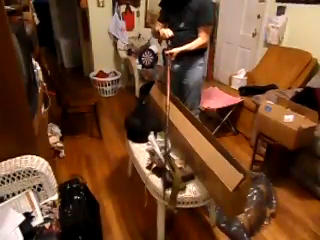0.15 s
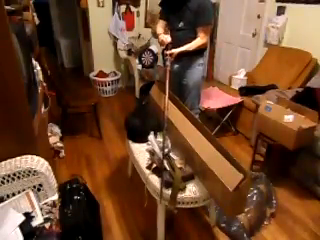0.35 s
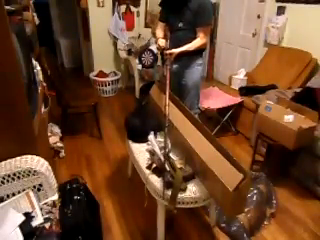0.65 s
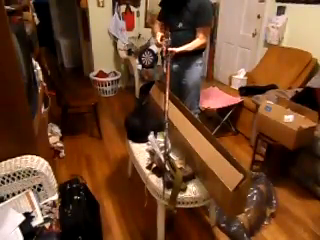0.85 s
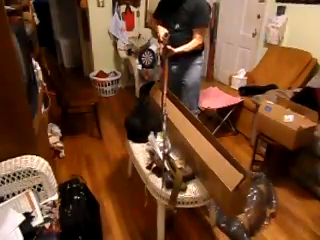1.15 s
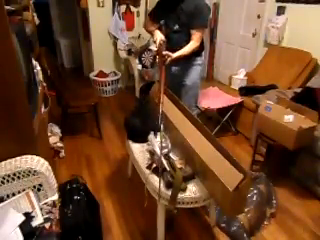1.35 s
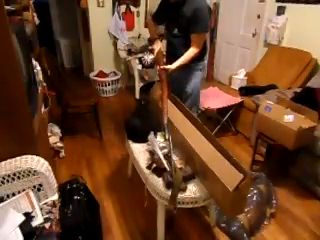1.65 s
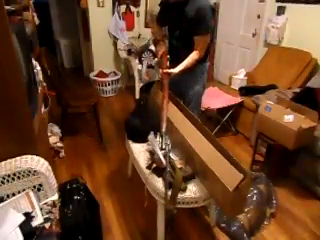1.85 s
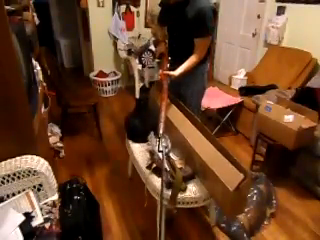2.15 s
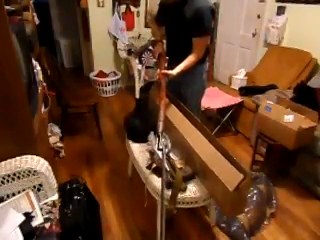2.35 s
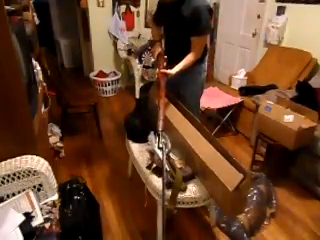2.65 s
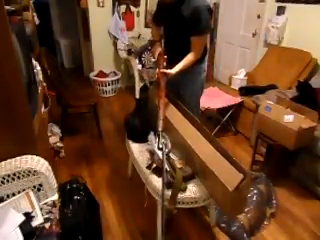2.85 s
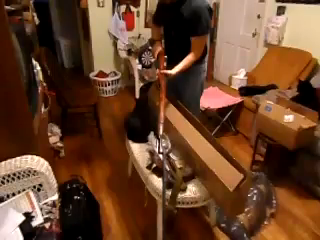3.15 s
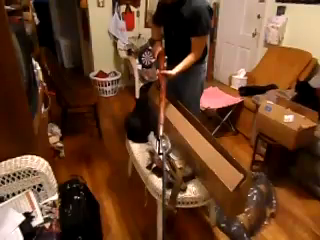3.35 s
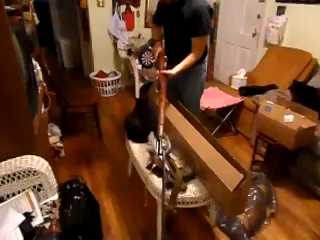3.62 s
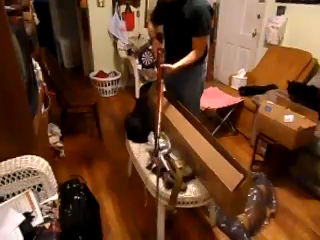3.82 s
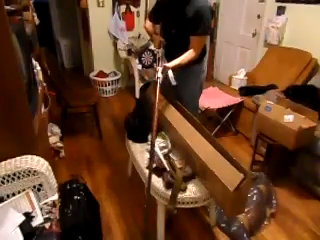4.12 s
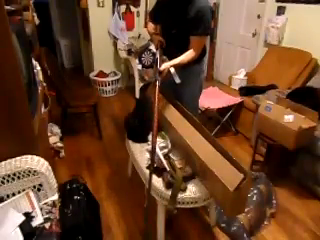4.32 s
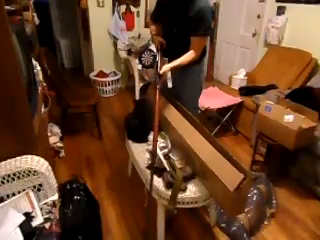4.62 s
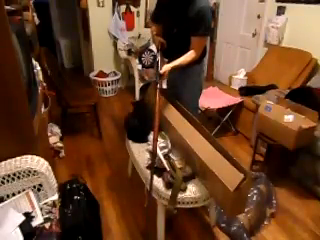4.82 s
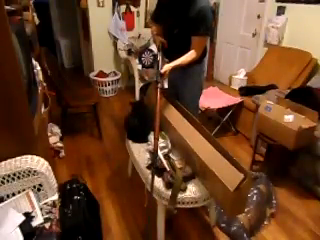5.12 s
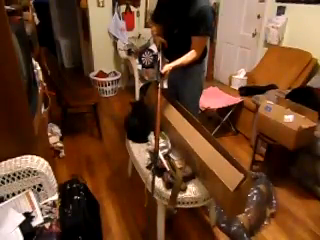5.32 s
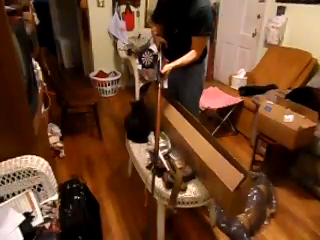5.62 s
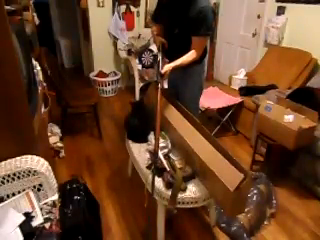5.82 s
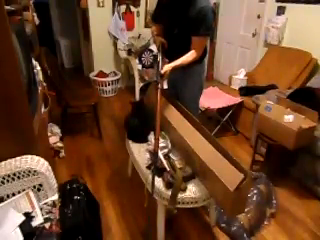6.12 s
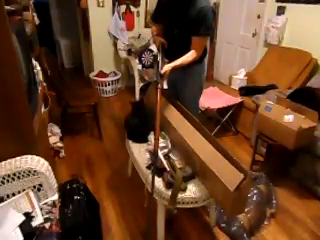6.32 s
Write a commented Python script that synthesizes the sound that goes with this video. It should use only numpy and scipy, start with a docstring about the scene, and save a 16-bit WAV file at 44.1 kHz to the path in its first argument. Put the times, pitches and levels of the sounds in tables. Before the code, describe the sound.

A rifle bolt is worked by hand in a furnished room with quick metal clacks, then light handling, two footsteps, and a sharp dry-fire snap.

```python
"""A bolt-action rifle is cycled in a furnished room: the bolt is lifted, drawn back, run home and locked. Each
blow is a dying burst of tiny impacts, coloured by the struck part, with decaying modes for the ring; rubbing is
random stick and slip. The striker later snaps on an empty chamber. Between the two, the fittings tick, the
sight clicks and the handler takes two steps on the wooden floor, while sleeves brush softly. House rumble lies
below; a small camera adds hiss, a thin whine, a faint buzz and gain control."""
import sys
import numpy as np
from scipy import signal
from scipy.fft import rfft, irfft
from scipy.io import wavfile

SR = 44100
rng = np.random.default_rng(int(sys.argv[2]) if len(sys.argv) > 2 else 0)


def store_wav(level_fs):
    """Save 16-bit WAV to argv[1]."""
    pcm = np.round(np.clip(np.atleast_2d(level_fs), -1, 1) * 32767)
    wavfile.write(sys.argv[1], SR, pcm.T.astype(np.int16))


N = 285327
T = np.arange(N) / SR  # time axis [s]

# Background spectrum of rumble and hiss: (frequency [Hz], relative level [dB])
HUSH_SPECTRUM = [(12, -28.5), (20, 8), (38, 0), (64, -2.5), (119, -14.5), (245, -17), (416, -24.5),
                 (705, -25.5), (1010, -28), (1820, -30.5), (8400, -37), (10200, -37), (11100, -38),
                 (15500, -36.5)]
HUSH_DB = -54  # rms level
# Decay time of the room: (frequency [Hz], t60 [s])
ROOM_DECAY = [(60, .2), (250, 0.24), (700, 0.26), (1500, .25), (3000, .27), (6500, .27), (10000, .23),
              (16000, .2)]
BAND_EDGE_HZ = 15780

# Steps: (heel lands [s], energy [dB], scuff before the heel [s], heel to sole and sole to toe [s],
# decay of sole and toe contacts [s], sway of the floor [dB])
STEPS = [(1.8722, -20.5, .074, .04, 0.067, -36), (2.36, -13.5, .156, .031, .016, -34.5)]
# Heel clack, sole thud, soft toe: (energy above the step's [dB], brightness [dB per octave],
# resonance of the board [Hz], its lift [dB])
FOOT_PARTS = [(-0.5, 1.5, 766, 10.5), (0, -1, 290, 8.5), (-7, -4, 57, 16)]
# A shoe brushes the floor before it lands: (energy [dB], brightness [dB per octave],
# contact decay [s], resonance of the board [Hz], its lift [dB])
SHOE_SCUFF = (-23, 1.3, 0.2, 277, 9)
# Colour of the floorboards: (frequency [Hz], relative level [dB])
BOARD_SPECTRUM = [(30, 6), (70, 1.5), (110, -2), (280, -4.5), (500, -12), (800, -18), (1300, -23),
                  (3000, -30.5), (12000, -57)]
# Modes of the boards, humming briefly after a step: (frequency [Hz], relative energy [dB], t60 [s])
PLANK_MODES = [(69.6, -10, 0.33), (146.8, -0.5, 0.22), (229, 2, 0.32), (285.5, -15, .3), (390, -9, 0.16),
               (763, -14, 0.21)]
HEEL_DECAY_S = 0.01
SWAY_DELAY_S = 0.016  # weight reaches the joists after the heel lands

# Sleeves brush as the arms move: (middle [s], half length [s], level [dB])
REACHES = [(.45, 0.5, -57.5), (1.413, 0.062, -61), (2.607, .6, -66.5), (4.35, 0.33, -65.5)]
# Colour of rubbed cloth: (frequency [Hz], relative level [dB])
CLOTH_SPECTRUM = [(60, -9), (150, -7.5), (300, -1.5), (700, -7), (1200, -17.5), (3000, -21), (15000, -32)]
FIDGET_DB = -73  # cloth between the movements

# Clear ticks of the fittings: (time [s], energy [dB], brightness [dB per octave],
# contact decay [s], resonance of the part [Hz], its lift [dB])
TICKS = [(1.1154, -24, -1, 0.0032, 6000, 11.5), (1.2688, -31, -1.5, .018, 13970, 3.5),
         (1.3136, -34.5, -4.5, 0.004, 2450, 8), (1.3825, -35, -2, .003, 800, 24),
         (1.4199, -32, -5, .008, 2060, 10), (1.5525, -31.5, -5, 0.011, 1720, 8.5),
         (2.1603, -31.5, -7, 0.0046, 1800, -2), (2.267, -30, -7.5, 0.0081, 783, 14),
         (2.6788, -29, 4, .017, 4300, 14.5), (2.9898, -30.5, -0.5, .0087, 4360, 10),
         (3.0003, -24.5, -0.5, 0.021, 4320, 14.5), (3.008, -29, -4, 0.01, 6220, 21),
         (3.068, -29, 2, 0.0066, 6610, 15), (3.3156, -35, -7, .0048, 4980, 6.5),
         (3.6059, -33.5, -7.5, 0.0096, 4730, 14)]
# Faint rattles as the grip shifts and with each step: (middle [s], half length [s], level [dB])
SHAKES = [(1.483, 0.089, -70), (1.949, 0.021, -58.5), (2.233, 0.036, -65.5), (2.402, 0.037, -53.5)]
# Colour of the fittings: (frequency [Hz], relative level [dB])
FITTING_SPECTRUM = [(100, -17), (600, -6.5), (1500, -0.5), (3000, -3), (6400, -2.5), (8500, -5),
                    (12000, -1.5), (14500, 4.5), (16000, -6.5)]
# Clicks of the sight: (time [s], energy [dB])
SIGHT_CLICKS = [(2.7257, -27), (3.1694, -30.5), (3.4306, -26.5), (3.6832, -26.5)]
# Colour of the sight: (frequency [Hz], relative level [dB])
SIGHT_SPECTRUM = [(200, -36), (950, -11), (1400, 3.5), (1750, -0.5), (2100, -1.5), (2800, -11),
                  (4500, -14.5), (8000, -20), (9400, -10.5), (11000, -26), (16000, -24)]
CLICK_TILT_DB, CLICK_DECAY_S, CLICK_HZ, CLICK_LIFT_DB = 0.5, 0.0053, 2047, 8  # tilt is per octave

# The sear lets go and the striker lands: (time [s], energy [dB], brightness [dB per octave],
# contact decay [s], resonance of the part [Hz], its lift [dB])
SNAP_CONTACTS = [(6.0227, -12, 10, 0.0021, 1204, 9.5), (6.0242, -4.5, -8.5, 0.0028, 9760, 4),
                 (6.0286, 16.5, 1.5, 0.0012, 9500, 5), (6.0328, 0.5, -3, 0.0015, 6410, 20.5)]
# Colour of the striker: (frequency [Hz], relative level [dB])
STRIKER_SPECTRUM = [(60, -10.5), (230, -20), (450, -22), (850, -22.5), (1100, -10.5), (1900, -6.5),
                    (2800, -1), (5000, -2), (6500, 0), (9300, -1), (12200, -4), (14200, 6), (15800, 6)]
# Modes of the striker and its spring: (frequency [Hz], relative energy [dB], t60 [s])
SPRING_MODES = [(1130, -12, .22), (2670, -14, .38), (2794, -12, .4), (2862, -13, .4), (4274, -11, .25),
                (4520, -13, .38), (6094, -9, .33), (6312, -7, .3), (6546, -8, .32), (9166, -3, .17),
                (9243, -1, .32), (9340, -1, .13), (12953, -5, .07), (13988, 2, .08), (14140, 0, .14),
                (14218, 0, .24), (14370, -1, .17), (15490, -6, .12)]

# Strokes of the bolt: (fastest at [s], speeding up [s], slowing down [s], level when fastest [dB])
STROKES = [(0, 0.017, 0.032, -53.5), (.31, .1, 0.047, -55.5), (.526, 0.12, 0.024, -34),
           (.68, .03, 0.095, -42), (0.739, 0.024, 0.096, -48)]
STROKE_RANGE_DB = 25  # fall in level over one speeding-up or slowing-down time
# Colour of the raceway: (frequency [Hz], relative level [dB])
RACEWAY_SPECTRUM = [(60, -25), (300, -21.5), (700, -2), (1100, 4.5), (1550, 5.5), (2100, -5), (3000, -1.5),
                    (4700, -2.5), (6500, -6.5), (10000, -12), (12500, -16), (15000, -13)]
# Modes of the bolt sleeve on the cocking cam: (frequency [Hz], width [Hz], relative energy [dB])
CAM_MODES = [(1600, 1100, -2.5), (2920, 1200, 1.5), (4350, 340, 1), (6100, 450, 0.5), (7350, 480, -4),
             (9300, 420, -3), (10310, 350, -5.5), (13850, 650, -11)]
# The cam zings as the handle lifts, then drags until it lets go
CAM_PEAK_S, CAM_SWELL_S, CAM_DB, CAM_DRAG_DB = .128, 0.015, -37, -53
# Hard stops (cocked, run home, locked): (time [s], energy [dB], brightness [dB per octave],
# contact decay [s], time between rebounds [s], loss per rebound [dB], resonance of the part [Hz],
# its lift [dB], first touch earlier by [s], energy of that touch [dB])
STOPS = [(.2242, -5, 0.5, 0.0043, .007, 1.5, 1450, 3.5, 0.0021, -3.5),
         (0.5313, 11.5, 2.5, .0014, .0048, 3.5, 2640, 2.5, .001, 4),
         (0.7286, -4, -3.5, 0.00087, .003, 2, 3290, 2.5, .0046, 2.5)]
TOUCH_TILT_DB, TOUCH_DECAY_S = 1.5, .002  # tilt is per octave
# Each rebound is duller and looser than the contact before it: change per rebound
REBOUND_TILT_DB, REBOUND_DECAY_S = -3.5, .003
# The loose bolt knocks in its raceway: (time [s], energy [dB], brightness [dB per octave],
# contact decay [s], resonance of the part [Hz])
KNOCKS = [(0.0666, -21.5, -8, .011, 1554), (0.4641, -33, -9.5, .003, 1490), (0.4827, -17.5, 1, .004, 1500),
          (0.5044, -5.5, -0.5, 0.0083, 1510), (0.6598, -11.5, -4, 0.0036, 1120),
          (0.8962, -26, -8, 0.0019, 1310)]
KNOCK_LIFT_DB = 10.5
# Colour of the struck steel: (frequency [Hz], relative level [dB])
STEEL_SPECTRUM = [(60, -21.5), (200, -24), (400, -16.5), (1000, -8.5), (1600, -4.5), (3300, 1.5),
                  (5200, -2.5), (7600, 0), (10000, -2.5), (12500, -4.5), (15500, -4.5)]
# Modes of stock, barrel, receiver and bolt body: (frequency [Hz], relative energy [dB], t60 [s])
RECEIVER_MODES = [(348, -9.5, .3), (932.7, -4.5, .15), (1665, -1, 0.13), (2140, -6, .2), (2606, -2.5, 0.27),
                  (2590, -3.5, 0.53), (2885, -4, 0.3), (3740, 0, 0.18), (4450, 0.5, .14), (6270, -4.5, .18),
                  (7160, -10.5, .14), (9630, -7, .18), (14600, -4, .15)]
SPRING_DB, RECEIVER_DB = -5, -12  # energy of the ring relative to the crack


def amp(db):
    """Level: converts decibels to an amplitude gain."""
    return 10 ** (np.asarray(db) / 20)


def unit(x):
    """Energy normalisation: scales the sum of squares to one."""
    return x / np.sqrt(np.sum(x ** 2) + 1e-20)


def evened(x):
    """Power normalisation: scales the rms to one."""
    return unit(x) * np.sqrt(len(x))


def read(points, hz):
    """Interpolation on a logarithmic frequency axis."""
    f, value = np.transpose(points)
    return np.interp(np.log(hz + 1), np.log(f + 1), value)


def add(mix, s, sound):
    """Superposition: mixes a sound in at time s."""
    part = mix[max(round(s * SR), 0):][:len(sound)]
    part += sound[:len(part)]


def swell(middle, half, db):
    """Gaussian envelope: the gain of one smooth movement that comes and goes."""
    return amp(db) * np.exp(-((T - middle) / half) ** 2)


def colour(spectrum, tilt=0, part_hz=1000, lift_db=0, width=0.17, size=4096):
    """Minimum phase: a causal response from a spectrum, its tilt per octave and one broad resonance."""
    hz = abs(np.fft.fftfreq(size, 1 / SR))
    octaves = np.log2(np.maximum(hz, spectrum[3][0]))  # the tilt leaves the bass alone
    resonance = 1 / (1 + (np.log2((hz + 1) / part_hz) / width) ** 2)
    log_gain = np.log(amp(read(spectrum, hz) + tilt * octaves + lift_db * resonance))
    # the Hilbert transform of the log gain supplies the phase
    response = np.exp(np.conj(signal.hilbert(log_gain - log_gain.max())))
    return unit(np.fft.ifft(response).real)


def chatter(decay, size=8192, count=2):
    """Rough contact: a dying burst of tiny impacts, evened out in spectrum."""
    fade = np.exp(-np.arange(size) / SR / max(decay, 1e-4))
    burst = rng.standard_normal(size) * fade
    for _ in range(count):
        z = rfft(burst)
        flat = irfft(z / (abs(z) + 1e-12))
        burst = flat * np.minimum(1, 10 * fade)
    return unit(burst)


def ring(modes):
    """Modal decay: a sum of dying partials, with new random phases at each blow."""
    t = np.arange(SR // 2) / SR
    phases = rng.random(len(modes))
    total = np.zeros(len(t))
    for (hz, db, t60), phase in zip(modes, phases):
        partial = np.sin(2 * np.pi * (hz * t + phase)) * amp(-60 * t / t60)
        total += amp(db) * unit(partial)
    return unit(total)


def room(wet_db, late_db, gap=.002, early_db=-3, early_decay=0.0087, late_stretch=2.0):
    """Reverberation: direct sound, furniture scatter, a short tail and a fainter slow one."""
    t = np.arange(SR // 2) / SR
    taps = rng.choice([-1., 1.], len(t)) * (rng.random(len(t)) < .2)
    hz, at, z = signal.stft(taps, SR, nperseg=256)
    fade = np.exp(-np.log(1000) * at / read(ROOM_DECAY, hz)[:, None])
    slow_fade = amp(late_db) * fade ** (1 / late_stretch)
    tail = signal.istft(z * np.hypot(fade, slow_fade), SR, nperseg=256)[1][:len(t)]
    response = signal.unit_impulse(len(t))
    add(response, gap, amp(wet_db) * unit(tail))
    add(response, gap, amp(wet_db + early_db) * chatter(early_decay))
    return response


def blows(rows, spectrum, wet_db, late_db, modes=None, ring_db=0):
    """Impact excitation: each coloured crack echoes in the room; the struck part may ring with it."""
    out = np.zeros(N)
    for s, db, tilt, decay, part_hz, lift_db in rows:
        crack = unit(signal.fftconvolve(chatter(decay), colour(spectrum, tilt, part_hz, lift_db)))
        # the rifle keeps moving, so each blow finds its own pattern of echoes
        add(out, s, amp(db) * signal.fftconvolve(crack, room(wet_db, late_db)))
        if modes:
            add(out, s, amp(db + ring_db) * ring(modes))
    return out


def slips(per_s, spread_db):
    """Stick and slip: random tiny impacts of uneven size."""
    size = amp(spread_db * np.minimum(rng.exponential(1, N), 3))
    happens = rng.random(N) < per_s / SR
    return evened(size * rng.standard_normal(N) * happens)


def hush(whine_hz=9884, whine_width_hz=9, whine_db=-79):
    """Filtered noise: low rumble of the house, microphone hiss and a thin electronic whine."""
    hz = np.fft.rfftfreq(N, 1 / SR)
    hiss = irfft(rfft(rng.standard_normal(N)) * amp(read(HUSH_SPECTRUM, hz)), N)
    whine_gain = 1 / (1 + ((hz - whine_hz) / whine_width_hz) ** 2)
    whine = irfft(rfft(rng.standard_normal(N)) * whine_gain, N)
    return amp(HUSH_DB) * evened(hiss) + amp(whine_db) * evened(whine)


def buzz(frame_hz=30, duty=.25, line_hz=1333, start_s=.006, db=-77):
    """Pulsed harmonics: the camera's electronics leak faint high tones once per picture frame."""
    comb = sum(np.sin(2 * np.pi * (k * line_hz * T + rng.random())) for k in range(6, 12))
    frame_phase = ((T - start_s) * frame_hz) % 1
    pulse = np.exp(-((frame_phase - .5) / (duty / 2)) ** 2)
    return amp(db) * evened(comb * pulse)


def joists(hz=21.36, t60=1.13):
    """Damped oscillation: the floor dips under each step and swings back slowly."""
    out, t = np.zeros(N), np.arange(SR) / SR
    swing = np.sin(2 * np.pi * hz * t) * np.exp(-np.log(1000) * t / t60)
    for s, *_, sway_db in STEPS:
        add(out, s + SWAY_DELAY_S, -amp(sway_db) * swing)
    return out


def footfalls():
    """Rolling contact: a scuff, then the foot rolls from heel to sole to toe."""
    rows = []
    for s, db, lead, roll, settle, _ in STEPS:
        rows.append((s - lead, *SHOE_SCUFF))
        for k, (part_db, tilt, hz, lift_db) in enumerate(FOOT_PARTS):
            decay = settle if k else HEEL_DECAY_S
            rows.append((s + k * roll, db + part_db, tilt, decay, hz, lift_db))
    return rows


def steps():
    """Struck boards: foot contacts excite the plank modes, and the joists sway beneath."""
    contacts = blows(footfalls(), BOARD_SPECTRUM, wet_db=-1.5, late_db=-16,
                     modes=PLANK_MODES, ring_db=-4.5)
    return contacts + joists()


def sleeves():
    """Fibre friction: soft, dense rubbing of cloth follows the arm movements."""
    motion = np.hypot(amp(FIDGET_DB), sum(swell(*reach) for reach in REACHES))
    return signal.oaconvolve(slips(per_s=1600, spread_db=2) * motion, colour(CLOTH_SPECTRUM))[:N]


def rattle(tilt_db=-6.5):
    """Loose contact: tiny random ticks of the fittings while the rifle is shaken."""
    drive = slips(per_s=1200, spread_db=5.5) * sum(swell(*shake) for shake in SHAKES)
    return signal.oaconvolve(drive, colour(FITTING_SPECTRUM, tilt_db))[:N]


def handling():
    """Light impacts: ticks of the fittings, and one kind of sight click at varied strength."""
    clicks = [(s, db, CLICK_TILT_DB, CLICK_DECAY_S, CLICK_HZ, CLICK_LIFT_DB) for s, db in SIGHT_CLICKS]
    ticks = blows(TICKS, FITTING_SPECTRUM, wet_db=2, late_db=-21.5)
    return ticks + blows(clicks, SIGHT_SPECTRUM, wet_db=4.5, late_db=-27)


def striker_snap():
    """Impact and modal decay: the striker lands, and it and its spring ring."""
    return blows(SNAP_CONTACTS, STRIKER_SPECTRUM, wet_db=4.5, late_db=-19.5,
                 modes=SPRING_MODES, ring_db=SPRING_DB)


def cam_pressure():
    """Friction load: a swell as the handle starts to lift, then a light drag up to the first stop."""
    dragging = (T > CAM_PEAK_S) * (T < STOPS[0][0])
    return swell(CAM_PEAK_S, CAM_SWELL_S, CAM_DB) + amp(CAM_DRAG_DB) * dragging


def cam():
    """Friction-driven resonance: fast slips on the cam make the bolt sleeve zing."""
    drive = slips(per_s=6000, spread_db=3.5) * cam_pressure()
    t = np.arange(2048) / SR
    sleeve = np.zeros(len(t))
    for k, (hz, width, db) in enumerate(CAM_MODES):
        mode = unit(np.exp(-np.pi * width * t) * np.sin(2 * np.pi * hz * t))
        # neighbouring modes swing in opposite senses, which fills the valleys between them
        sleeve += (-1) ** k * amp(db) * mode
    return signal.oaconvolve(drive, unit(sleeve))[:N]


def stroke(fastest, rise, fall, db):
    """Speed-dependent friction: rubbing grows as the bolt gathers speed and fades as it slows."""
    away = np.maximum((fastest - T) / rise, (T - fastest) / fall)
    return amp(db - STROKE_RANGE_DB * np.minimum(away, 10))


def slide():
    """Sliding friction: gritty rubbing of the bolt in the receiver."""
    drive = slips(per_s=1500, spread_db=2.5) * sum(stroke(*row) for row in STROKES)
    return signal.oaconvolve(drive, colour(RACEWAY_SPECTRUM))[:N]


def bolt_contacts(count=3):
    """Repeated impact: each stop is a touch, a blow and fading rebounds; loose knocks are added."""
    rows = [(*knock, KNOCK_LIFT_DB) for knock in KNOCKS]
    for s, db, tilt, decay, gap, loss_db, hz, lift_db, lead, touch_db in STOPS:
        rows.append((s - lead, touch_db, TOUCH_TILT_DB, TOUCH_DECAY_S, hz, 0))
        for k in range(count):  # the blow itself, then its rebounds
            rows.append((s + k * gap, db - k * loss_db, tilt + k * REBOUND_TILT_DB,
                         decay + k * REBOUND_DECAY_S, hz, lift_db))
    return rows


def bolt_clacks():
    """Impact and modal decay: blows of the bolt set stock, barrel, receiver and bolt body ringing."""
    return blows(bolt_contacts(), STEEL_SPECTRUM, wet_db=2.5, late_db=-25.0,
                 modes=RECEIVER_MODES, ring_db=RECEIVER_DB)


def scene():
    """Superposition: background, steps, handling, snap and bolt action sum linearly."""
    background = hush() + buzz()
    rubbing = signal.oaconvolve(cam() + slide() + rattle(), room(wet_db=-0.5, late_db=-23.5))[:N]
    mix = background + steps() + sleeves() + handling() + striker_snap() + rubbing + bolt_clacks()
    return mix[None]


def record(dry, threshold_db=-24, squeeze=0.39, recovery_db_per_s=9):
    """Gain control: the level ducks after loud blows and recovers slowly; then a band limit."""
    smooth_b, smooth_a = [1 / 200], [1, 1 / 200 - 1]  # one-pole average over about 200 samples
    power = signal.lfilter(smooth_b, smooth_a, dry[0] ** 2)
    over_db = squeeze * np.maximum(10 * np.log10(power + 1e-12) - threshold_db, 0)
    # a running maximum against a ramp makes the ducking recover at a steady rate
    ramp_db = recovery_db_per_s * T
    held_db = np.maximum.accumulate(over_db + ramp_db) - ramp_db
    duck_db = signal.lfilter(smooth_b, smooth_a, held_db)
    low_pass = signal.firwin(301, BAND_EDGE_HZ, window=("kaiser", 8), fs=SR)
    return signal.oaconvolve(dry * amp(-duck_db), low_pass[None], "same")


dry = scene()
out = record(dry)
store_wav(out)
```